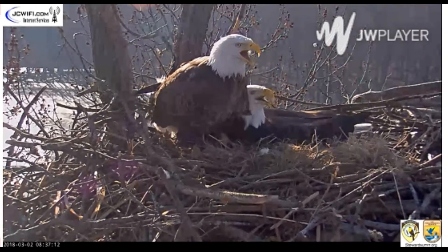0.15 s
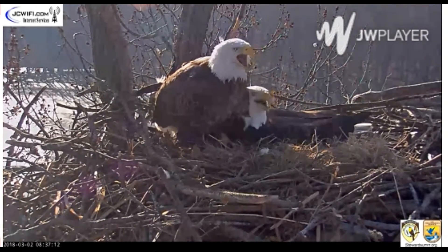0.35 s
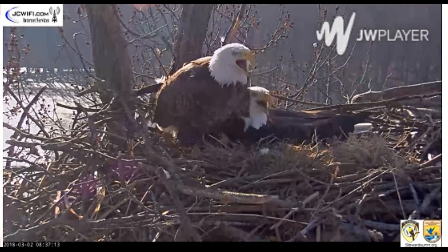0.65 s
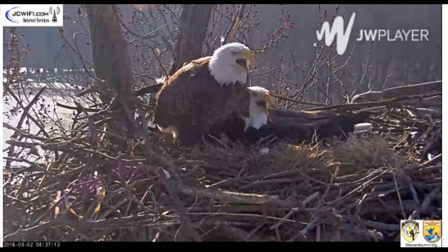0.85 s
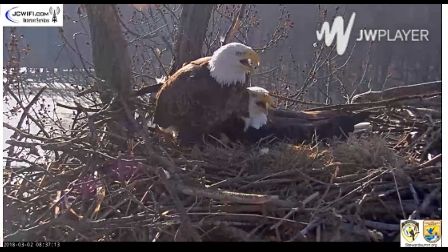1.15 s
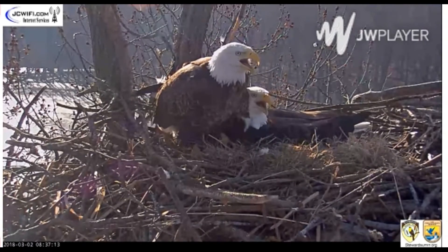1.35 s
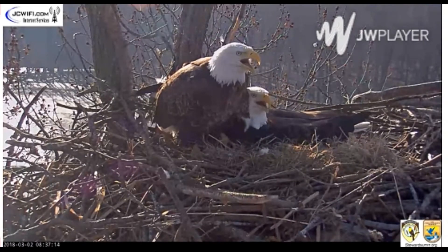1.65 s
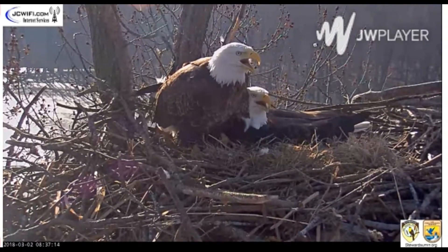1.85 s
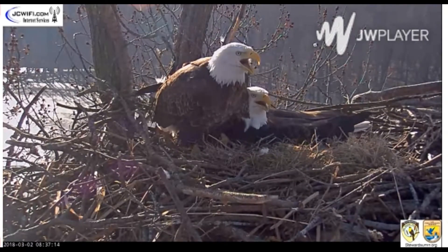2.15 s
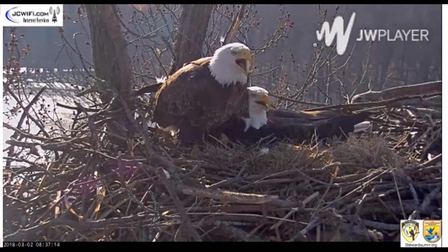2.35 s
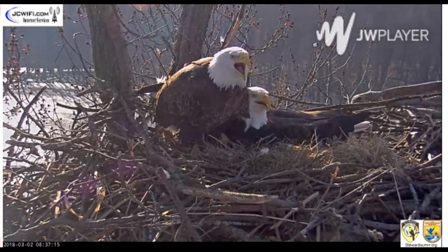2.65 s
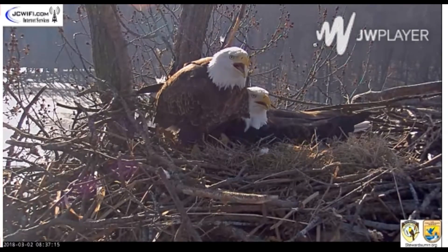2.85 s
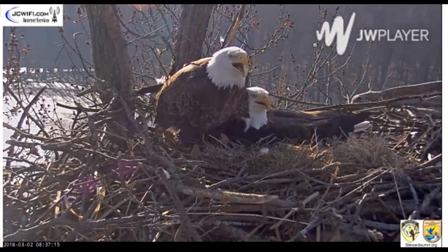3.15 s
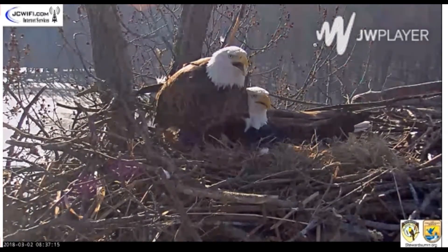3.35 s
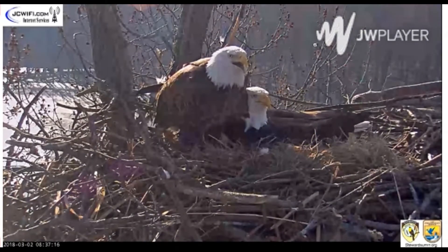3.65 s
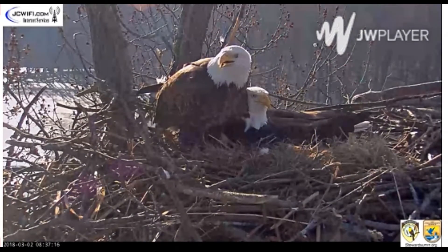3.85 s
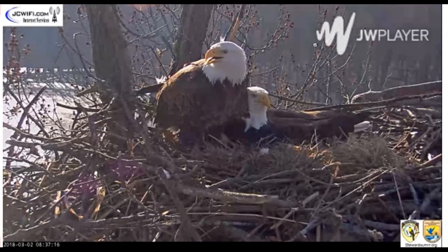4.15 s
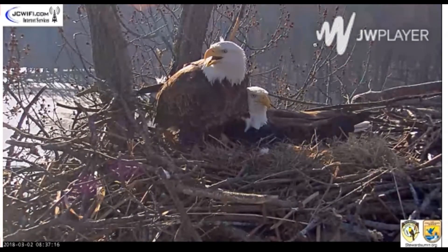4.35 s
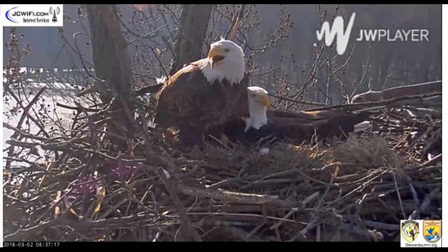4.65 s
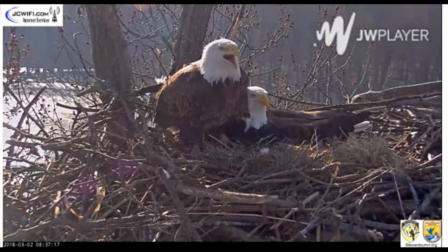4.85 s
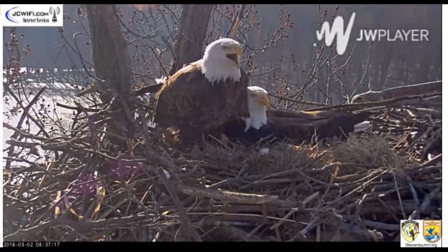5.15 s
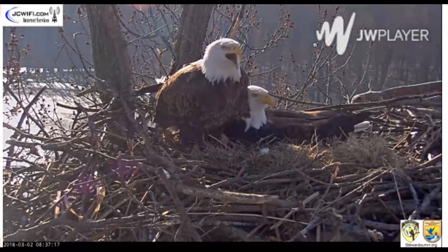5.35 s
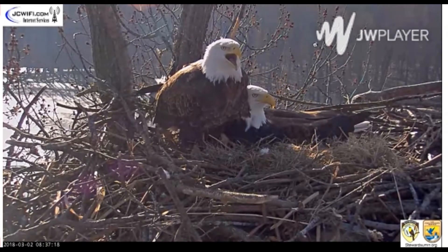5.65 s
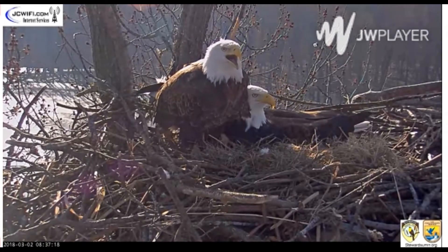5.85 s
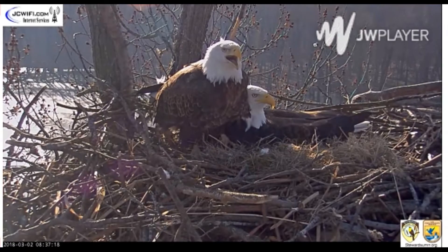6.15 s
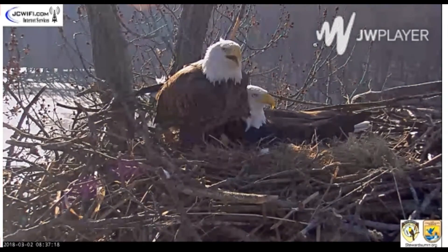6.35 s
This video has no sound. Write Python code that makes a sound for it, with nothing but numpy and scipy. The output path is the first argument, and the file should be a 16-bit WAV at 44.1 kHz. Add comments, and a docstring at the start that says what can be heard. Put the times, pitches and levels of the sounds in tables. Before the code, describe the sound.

Outdoors at a treetop nest, a steady low rumble with a slightly wavering hum continues throughout, under quiet hiss and very thin electrical tones. At about 0.3 seconds a close bald eagle starts with a softer chirp, then two piercing whistled notes at 0.45 and 0.6, so loud that the microphone overloads harshly. Shorter, lower pipes follow at 0.7 and 0.85, dwindling to weak clucks by 1.25. Faint twig rustles come near 1.45 and 2.25. A second similar run begins at 2.45, peaks at 2.55 to 2.7, then steps down and fades by 3.55, with a tiny tick at 3.3. The rumble dominates until 5.7, with barely audible distant calls around 5. A shorter, quieter third run falls from 5.7 to 6.2. Faint wavering bird whistles answer from afar until the end at 6.5. Light, scattered woodland echoes trail the notes.

```python
"""Three falling runs of short piping notes: an eagle on a treetop nest, close to an outdoor camera.
A steady low rumble, thin electrical tones, hiss, twig rustles and a few far birds lie behind.
The voice sums gliding harmonics, breath noise, puffs and low noise bursts; sparse random echoes return it.
Far birds are wavering whistles; the floor is filtered noise and steady sines.
The loudest notes overload the input, which folds overtones down into the band."""
import sys
import numpy as np
from scipy import signal
from scipy.fft import rfft, irfft
from scipy.io import wavfile
from scipy.ndimage import uniform_filter1d

SR = 44100
rng = np.random.default_rng(int(sys.argv[2]) if len(sys.argv) > 2 else 0)


def transcribe(signal):
    """Save signal, clipped to [-1, 1], as a 16-bit WAV file at the path in sys.argv[1]."""
    frames = np.atleast_2d(signal).T
    limited = np.clip(frames, -1, 1)
    pcm = np.round(limited * 32767).astype(np.int16)
    wavfile.write(sys.argv[1], SR, pcm)


def invert_db(level):
    """Linear amplitude ratio for a level in decibels (20 dB per decade), elementwise."""
    return 10 ** (np.asarray(level, dtype=float) / 20)


N = 287532  # samples

# relative spectrum of breath and rustle noise: pitch_hz, level_db
BREATH = [(300, -37.5), (1000, -20), (2500, -16.5), (4000, 0), (5500, 4.5), (6500, 3), (7500, -12),
          (8000, -39)]
# the voice leaps above a high note, which ducks meanwhile:
# start_s, end_s, pitch_hz, level_db, end_level_db, duck_db
LEAPS = [(0.449, 0.465, 5518, 3.5, -12.5, -9), (2.57, 2.59, 5582, 0, 1, -11)]


def evened(x):
    """Normalisation: scales to rms 1."""
    return x / np.sqrt(np.mean(x ** 2) + 1e-20)


def coloured(x, points):
    """Linear filtering: multiplies the spectrum by a gain curve of (Hz, dB) points."""
    hz, db = np.transpose(points)
    grid = np.fft.rfftfreq(len(x), 1 / SR)
    gain_db = np.interp(np.log(grid + 1), np.log(hz + 1), db)
    return irfft(rfft(x) * invert_db(gain_db), len(x))


def wander(rate_hz):
    """Low-pass random fluctuation: white noise through a leaky integrator, rms 1."""
    noise = uniform_filter1d(rng.standard_normal(N), 30)
    return evened(signal.lfilter([1], [1, -np.exp(-2 * np.pi * rate_hz / SR)], noise))


def rumble():
    """Band-shaped noise plus a narrow-band tone: a carrier with slow random modulation wavers."""
    # relative spectrum of the low noise: pitch_hz, level_db
    rumble_shape = [(26, -67.5), (44, -39.5), (64, -21.5), (68, -10), (79, -6.5), (87, -4.5), (103, 2.5),
                    (134, -5.5), (151, -5.5), (169, -11.5), (195, -19.5), (205, -26.5), (260, -50),
                    (340, -91.5), (570, -120)]
    noise_db, tone_hz, width_hz, tone_db = -21.5, 97, 2.1, -28.5
    noise = rng.standard_normal(N) + 1j * rng.standard_normal(N)
    sway = signal.lfilter([1], [1, -np.exp(-np.pi * width_hz / SR)], noise)
    sway += 3.06 * np.sqrt(np.mean(abs(sway) ** 2))  # a steady core keeps the tone from dropping out
    tone = evened((sway * np.exp(2j * np.pi * tone_hz * np.arange(N) / SR)).real)
    low_noise = evened(coloured(rng.standard_normal(N), rumble_shape))
    return invert_db(noise_db) * low_noise + invert_db(tone_db) * tone


def hiss():
    """Broadband noise with slight random amplitude modulation, over the steady sines of the electronics."""
    # relative spectrum of the hiss: pitch_hz, level_db
    hiss_shape = [(140, -43), (240, -19), (323, 2.5), (352, -4), (421, -3.5), (481, -21.5), (1070, -14),
                  (1220, -22), (1610, -16.5), (1900, -38.5), (2080, -22), (2510, -31), (4340, -20.5),
                  (7180, -28.5), (8200, -46), (10700, -79.5), (18000, -120)]
    # steady electrical tones: pitch_hz, level_db (rms)
    whine = [(1050, -75), (1561, -81), (1588, -76.5), (2099, -76.5), (2132, -84), (3903, -86),
             (4199, -86.5), (4231, -80), (4737, -89.5)]
    hiss_db, flicker_db = -59.5, 0.8
    t = np.arange(N) / SR
    tones = sum(np.sqrt(2) * invert_db(db) * np.sin(2 * np.pi * (hz * t + rng.random())) for hz, db in whine)
    noise = evened(coloured(rng.standard_normal(N), hiss_shape))
    return invert_db(hiss_db + flicker_db * wander(8)) * noise + tones


def voices(tones, fade_s, wobble, flutter_db):
    """Additive synthesis: near-sine harmonics follow each table; also returns the loudness over time.

    wobble is the rms pitch jitter as a fraction; flutter_db the rms level jitter."""
    out, loud = np.zeros(N), np.zeros(N)
    bend, flutter = wander(200), wander(71)
    for rows in tones:
        s, hz, *levels = np.transpose(rows)
        at = np.arange(round((s[0] - fade_s) * SR), min(round((s[-1] + fade_s) * SR), N))
        t = at / SR
        pitch = np.interp(t, s, hz)
        fade = np.clip(np.minimum(t - t[0], s[-1] + fade_s - t) / fade_s, 0, 1) ** 2
        turns = np.cumsum(pitch * (1 + wobble * bend[at])) / SR
        for k, db in enumerate(levels, 1):
            thinning = np.clip((8600 - k * pitch) / 400, 0, 1)  # harmonics fade out by 8600 Hz
            size = fade * invert_db(np.interp(t, s, db)) * thinning
            wave = np.sin(2 * np.pi * k * turns)
            out[at] += np.sqrt(2) * size * invert_db(flutter_db * flutter[at]) * wave
            loud[at] += size
    return out, loud


def moments(start, end):
    """Sampling of a contour: about one time point a millisecond."""
    return np.linspace(start, end, num=round((end - start) * 1000) + 2)


def ramp(t, start, length):
    """Linear transition: goes from 0 to 1 over length, from start on."""
    return np.clip((t - start) / length, 0, 1)


def caught(t):
    """Brief amplitude modulation: Gaussian level changes in dB where the voice catches."""
    # dips, one lift and two rows without change: time_s, change_db
    catches = [(0.343, -4), (0.44, 3.5), (0.446, -10.5), (0.454, -5.5), (0.464, -8.5), (0.574, -8),
               (0.583, 0), (0.72, -14.5), (0.843, -5.5), (0.854, -7), (2.495, 0), (2.568, -11.5),
               (2.579, -4.5), (2.588, -12.5), (2.705, -2), (2.717, -2.5), (2.845, -4), (2.868, -12.5),
               (3.001, -4), (5.697, -10.5), (5.992, -7.5), (6.011, -2.5), (6.19, -5)]
    catch_s = 0.0032  # half-width at 1/e of the change
    return sum(db * np.exp(-((t - s) / catch_s) ** 2) for s, db in catches)


def overtones(hz, second_db):
    """Harmonic series: levels of the second and third harmonic, the third set by pitch."""
    # third harmonic relative to the second: pitch_hz, level_db
    third = [(1400, -3.5), (2260, -7), (2450, -37.5)]
    return second_db, second_db + np.interp(hz, *np.transpose(third))


def arch(start, top, end, onset_hz, top_hz, db, second_db, onset_db):
    """Frequency glide: pitch rises to the top, then sags ever faster while the note dies."""
    sag_hz, sag_s, sag_power = 470, 0.033, 2.3  # the pitch lies sag_hz under its top sag_s after it
    attack_s, start_db, bright_onset_db = 0.002, -9.5, 3.5
    # pairs: first harmonic, higher harmonics
    droop_db, release_db, release_power = (-5, -9), (-25, -30), 3.2
    t = moments(start, end)
    before = 1 - ramp(t, start, top - start)
    after = ramp(t, top, end - top)
    rise = (top_hz - onset_hz) * before ** 2
    sag = sag_hz * (np.maximum(t - top, 0) / sag_s) ** sag_power
    hz = top_hz - rise - sag
    shared = db + start_db * (1 - ramp(t, start, attack_s)) + onset_db * before
    first, higher = (shared + droop * after + release * after ** release_power
                     for droop, release in zip(droop_db, release_db))
    upper = overtones(hz, higher + second_db + bright_onset_db * before)
    return np.transpose([t, hz, first + caught(t), *upper])


def high_note(start, step, step_s, end, head_hz, top_hz, db):
    """Register step: a flat head, a step up, then a quadratic sag; it ducks under any leap."""
    sag_hz_per_s2, hold_s = 630000, 0.0034
    attack_s, start_db, release_s, end_db = 0.0058, -14.5, 0.007, -18
    step_dip_db, regain_s = -6, 0.026  # the note weakens at the step and regains its strength
    duck_edge_s = 0.0059
    t = moments(start, end)
    stepped = ramp(t, step - step_s, step_s)
    sag = sag_hz_per_s2 * np.maximum(t - step - hold_s, 0) ** 2
    hz = head_hz + (top_hz - head_hz) * stepped - sag
    level = db + start_db * (1 - ramp(t, start, attack_s)) + end_db * ramp(t, end - release_s, release_s)
    level = level + step_dip_db * stepped * (1 - ramp(t, step, regain_s))
    for up, down, *_, duck_db in LEAPS:
        ducked = ramp(t, up - duck_edge_s, duck_edge_s) * (1 - ramp(t, down, duck_edge_s))
        level = level + duck_db * ducked
    return np.transpose([t, hz, level + caught(t)])


def leap(start, end, hz, db, end_db, _):
    """Register jump: a pure tone of steady pitch above the high note."""
    t = moments(start, end)
    level = np.interp(t, [start, end], [db, end_db]) + caught(t)
    return np.transpose([t, hz + 0 * t, level])


def chip(start, peak, end, from_hz, to_hz, db, second_db):
    """Short linear glide with a rise and fall in level."""
    rise_db, fall_db = -10, -17.5  # start and end relative to the peak
    dull_db = -9  # overtones fall further than the first harmonic
    s = [start, peak, end]
    level = db + np.array([rise_db, 0, fall_db])
    hz = np.interp(s, [start, end], [from_hz, to_hz])
    return np.transpose([s, hz, level, *overtones(hz, level + second_db + [0, 0, dull_db])])


def patchy_air(patchy_db):
    """Turbulence noise: short-time spectra with random gains in small patches of time and frequency."""
    z = signal.stft(coloured(rng.standard_normal(N), BREATH), nperseg=256, noverlap=192)[2]
    patches = uniform_filter1d(rng.standard_normal(z.T.shape), size=5, axis=0)  # over time
    patches = uniform_filter1d(patches, size=6, axis=1)  # over frequency
    z = z * invert_db(patchy_db * evened(patches.T))
    return evened(signal.istft(z, nperseg=256, noverlap=192)[1][:N])


def eagle():
    """Tone plus noise: piping, breath noise scaled by its loudness and swells, puffs, and low noise bursts."""
    # arched notes: start_s, top_s, end_s, onset_hz, top_hz, level_db,
    # second_db (second harmonic relative to first), onset_db (relative to top)
    arches = [(0.319, 0.347, 0.385, 3900, 4580, -20, -13, -3),
              (0.688, 0.709, 0.742, 3488, 3668, -5.5, -6.5, -7.5),
              (0.823, 0.843, 0.864, 3440, 3405, -12, -9.5, -1.5),
              (2.453, 2.47, 2.505, 3642, 3747, -9, -8, -5), (2.832, 2.857, 2.888, 3484, 3584, -7, -6, -4),
              (2.991, 3.006, 3.037, 3435, 3447, -14.5, -6, 0),
              (5.69, 5.713, 5.756, 3599, 3935, -26, -4.5, -4),
              (5.823, 5.849, 5.876, 3250, 3424, -12.5, -4.5, -2),
              (5.985, 6.001, 6.03, 3292, 3298, -14.5, -2, -2.5),
              (6.175, 6.194, 6.204, 2220, 2280, -24, -1.5, 0)]
    # loud high notes: start_s, step_done_s, step_length_s, end_s, head_hz, top_hz, level_db
    high_notes = [(0.428, 0.445, 0.003, 0.483, 4430, 4825, -3.5),
                  (0.557, 0.572, 0.005, 0.604, 4480, 4710, -2),
                  (2.553, 2.566, 0.003, 2.608, 4570, 5017, -3),
                  (2.685, 2.703, 0.014, 2.73, 4440, 4698, -1.5)]
    # clucks, note ends in another register, side tones:
    # start_s, peak_s, end_s, from_hz, to_hz, level_db, second_db (second harmonic relative to first)
    chips = [(0.482, 0.483, 0.5, 3500, 3250, -37, -25), (0.604, 0.606, 0.622, 3650, 3150, -23.5, -26.5),
             (0.835, 0.841, 0.848, 1390, 1327, -37.5, -29.5), (0.959, 0.963, 0.966, 2380, 2500, -31, -15),
             (0.963, 0.967, 0.973, 2590, 2590, -48, 25), (0.98, 0.981, 0.992, 3428, 3080, -29, 10.5),
             (1.094, 1.098, 1.11, 2310, 2192, -21.5, -8), (1.114, 1.12, 1.12, 3010, 2614, -60.5, 33.5),
             (1.22, 1.224, 1.242, 1472, 1284, -32.5, -14.5), (2.439, 2.459, 2.455, 3800, 4480, -19, -5.5),
             (2.434, 2.435, 2.442, 3444, 4010, -42.5, 12), (2.73, 2.74, 2.75, 3596, 3160, -16.5, -11),
             (2.98, 2.993, 3.002, 2255, 2440, -44.5, -24.5), (3.155, 3.158, 3.167, 2500, 2547, -25.5, 8),
             (3.168, 3.179, 3.179, 2540, 2520, -36, -4), (3.18, 3.182, 3.194, 3190, 2613, -46.5, 13.5),
             (3.325, 3.328, 3.338, 2228, 2206, -22, 0.5), (3.333, 3.348, 3.358, 2202, 2110, -27, -6.5),
             (3.336, 3.346, 3.358, 3650, 3550, -39, -35), (3.341, 3.351, 3.358, 1503, 1323, -36, -26),
             (3.512, 3.515, 3.533, 1438, 1265, -33, -15), (5.99, 5.995, 6.012, 1610, 1535, -45.5, -30.5),
             (5.711, 5.712, 5.724, 3365, 3530, -38, -22), (6.21, 6.196, 6.224, 3305, 2800, -30, 10)]
    # relative spectrum of the low noise burst under loud notes and onsets: pitch_hz, level_db
    burst_shape = [(100, -12.5), (300, -1), (800, -2.5), (1500, -6.5), (2500, -8.5), (4000, -27.5)]
    # puffs that open a note: time_s, level_db
    snap_rows = [(0.826, -28), (2.833, -35.5), (2.992, -34.5), (3.156, -40.5), (5.987, -36.5)]
    snap_s = 0.003  # half-width at 1/e
    tones = [high_note(*row) for row in high_notes] + [arch(*row) for row in arches]
    tones += [chip(*row) for row in chips] + [leap(*row) for row in LEAPS]
    pipe, loud = voices(tones, fade_s=0.0031, wobble=0.0081, flutter_db=-0.45)
    swell = abs(uniform_filter1d(np.maximum(np.gradient(loud) * SR * 0.0046, 0), size=130))
    smooth_loud = abs(uniform_filter1d(loud, size=900))  # breath level, smoothed over about 20 ms
    burst_size = invert_db(-44.5) * loud ** 3 + invert_db(-37.5) * swell
    burst = evened(coloured(rng.standard_normal(N), burst_shape)) * burst_size
    t = np.arange(N) / SR
    snaps = sum(invert_db(db) * np.exp(-((t - s) / snap_s) ** 2) for s, db in snap_rows)
    air_size = snaps + invert_db(-38.5) * loud ** 0.8 + invert_db(-37) * smooth_loud + invert_db(-20.5) * swell ** 1.8
    return pipe + burst + patchy_air(patchy_db=7.5) * air_size


def scatter(start_s, t60):
    """Diffuse scattering: sparse echoes of random sign die away by 60 dB in t60 seconds, energy 1."""
    taps = np.zeros(SR)
    at = np.arange(0, SR - 20, 20) + rng.integers(0, 20, (SR - 1) // 20)
    taps[at] = rng.choice([-1., 1.], len(at))
    t = np.arange(SR) / SR
    taps *= invert_db(-60 * t / t60) * (t > start_s)
    return taps / np.linalg.norm(taps)


def treetop(x):
    """Reverberation by convolution: nest and branches reflect quickly, the woods later and duller."""
    # colour of the far return: pitch_hz, gain_db
    woods_colour = [(1000, -6), (2300, -3), (3500, 0.5), (4500, -2), (5500, -10), (7000, -6), (8000, -4)]
    late = signal.lfilter([.4], [1, -.6], scatter(0.065, 1.0))  # its treble is weaker
    woods = invert_db(-32.5) * scatter(0.025, 0.88) + invert_db(-37.0) * late
    echoes = invert_db(-16) * scatter(.003, 0.067) + coloured(woods, woods_colour)
    return signal.fftconvolve(x, echoes)[:N] * invert_db(3.5 * wander(36))  # moving air makes the return flutter


def rustles():
    """Enveloped noise: faint twig sounds as short Gaussian puffs of treble."""
    # time_s, length_s (full width at 1/e), level_db
    puffs = [(1.43, 0.021, -61.5), (1.453, 0.022, -59.5), (2.081, .015, -73.5), (2.254, 0.029, -61),
             (3.294, 0.0078, -63), (3.315, 0.0029, -46.5), (3.498, .003, -58)]
    t = np.arange(N) / SR
    size = sum(invert_db(db) * np.exp(-((t - s) / length * 2) ** 2) for s, length, db in puffs)
    return size * evened(coloured(rng.standard_normal(N), BREATH))


def far_birds():
    """Frequency-modulated whistles: faint tones follow pitch contours with random jitter."""
    # one table a faint far whistle: time_s, pitch_hz, level_db
    whistles = [
        [(2.1, 1300, -70.5), (2.17, 1350, -64.5), (2.25, 1400, -71.5)],
        [(4.52, 3390, -75.5), (4.545, 3150, -68.5), (4.565, 2940, -72.5)],
        [(6.04, 5600, -68), (6.11, 5400, -66.5), (6.17, 4907, -56.5), (6.25, 4578, -58), (6.32, 4440, -52)],
        [(6.06, 4900, -68), (6.17, 4420, -72), (6.24, 4020, -54.5), (6.32, 3880, -56), (6.4, 3800, -78.5)],
        [(6.42, 6250, -71), (6.45, 6240, -69), (6.475, 6240, -68.5)],
        [(6.43, 4940, -77.5), (6.46, 4780, -64), (6.48, 4460, -72)],
        [(6.485, 5150, -72), (6.5, 4950, -57), (6.519, 4910, -52)],
    ]
    # a blurred pair of far calls: time_s, pitch_hz, level_db
    hoarse = [
        [(4.95, 3870, -70), (5.08, 3780, -70), (5.2, 3870, -71), (5.38, 3930, -73.5)],
        [(4.98, 4080, -71.5), (5.1, 4200, -74), (5.2, 4190, -73)],
    ]
    clear_calls = voices(whistles, fade_s=0.018, wobble=0.0037, flutter_db=2.0)[0]
    return clear_calls + voices(hoarse, fade_s=.04, wobble=0.014, flutter_db=1.5)[0]


def scene():
    """Superposition: the eagle and its echoes, far birds with stronger echoes, rustles and the floor."""
    near = eagle()
    far = far_birds()
    echoes = treetop(near + invert_db(8.5) * far)
    return (near + echoes + far + rustles() + rumble() + hiss())[None]


def low_pass(x):
    """Removes everything above the highest recorded frequency."""
    return signal.sosfilt(signal.butter(12, 21000, fs=SR, output="sos"), x)


def record(dry):
    """Clipping and aliasing: overload at a low sample rate folds overtones; top treble is mirrored upward."""
    # filter ahead of the camera's sampler: pitch_hz, gain_db
    input_edge = [(7750, -1), (8000, -13)]
    # colour of the mirrored treble: pitch_hz, gain_db
    mirror_colour = [(8000, -1.5), (8500, -8.5), (9000, -20.5), (9600, -39), (10500, -47), (11500, -92)]
    # treble loss after the second overload: pitch_hz, gain_db
    late_edge = [(11000, 1), (12500, -10), (15500, -14.5), (16300, -32)]
    camera_rate_hz = 16000
    slow = signal.resample(coloured(dry[0], input_edge), round(N * camera_rate_hz / SR))
    heard = signal.resample(np.clip(slow, -1.03, 1.03), N)
    mirror = heard * 2 * np.cos(2 * np.pi * camera_rate_hz * np.arange(N) / SR)
    full = np.clip(heard + coloured(mirror, mirror_colour), -.87, .87)  # a second overload
    sent = coloured(full, late_edge)
    return low_pass(sent[None])


dry = scene()
out = record(dry)
transcribe(out)
```